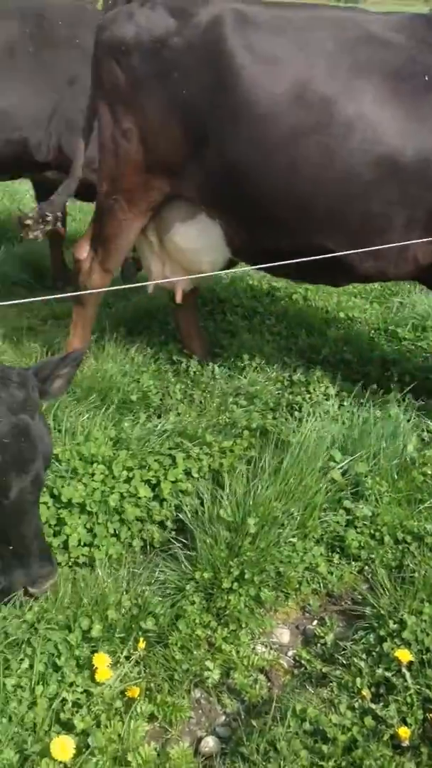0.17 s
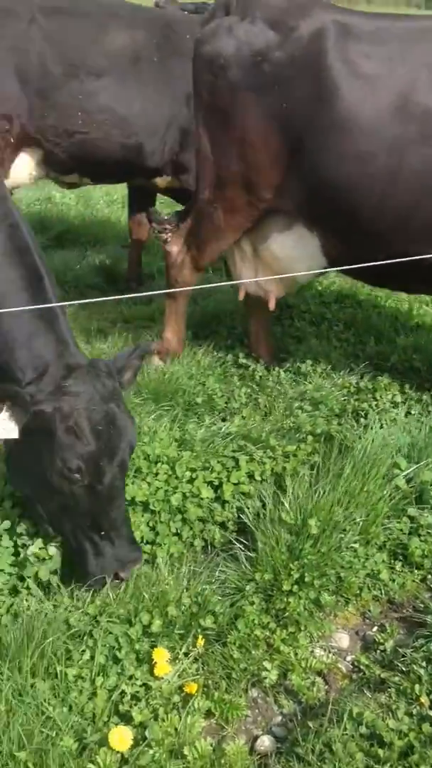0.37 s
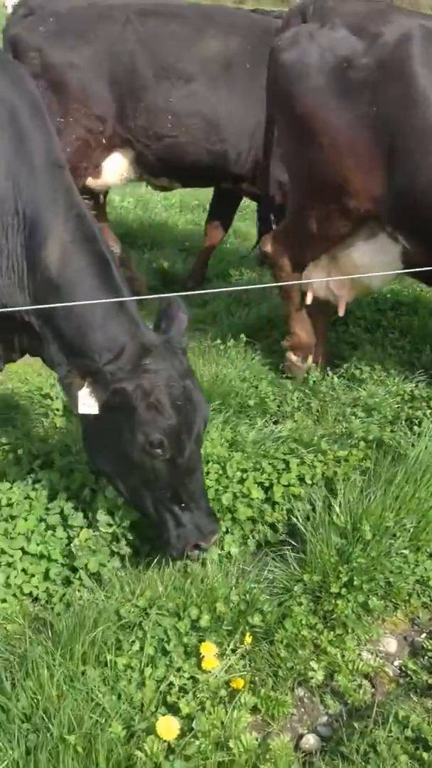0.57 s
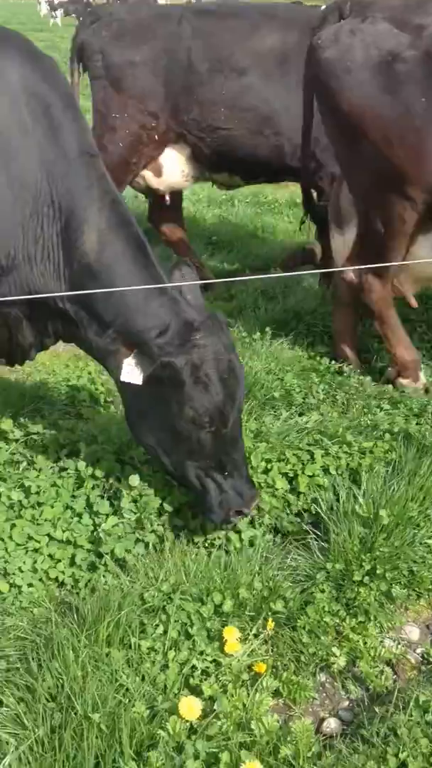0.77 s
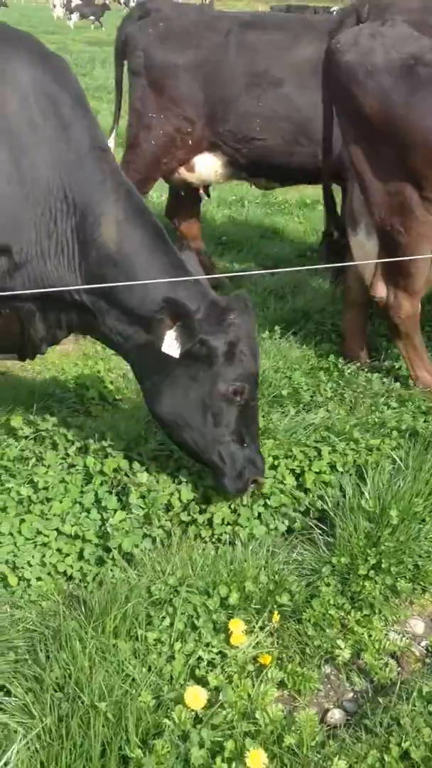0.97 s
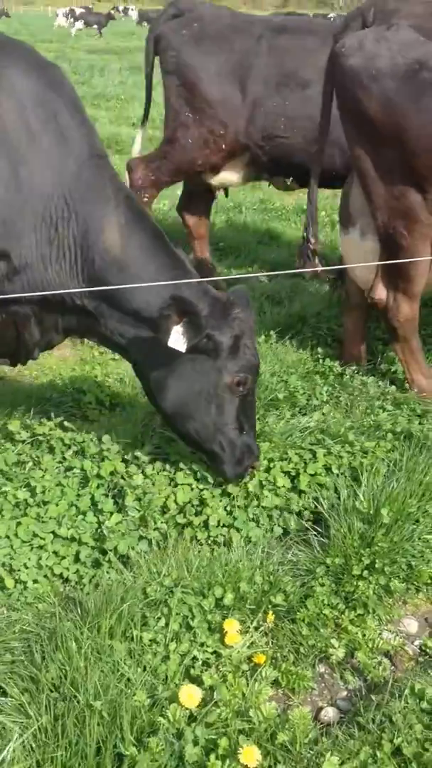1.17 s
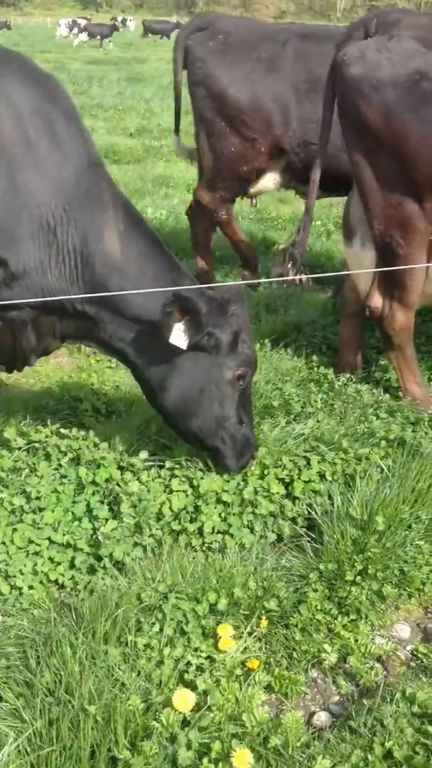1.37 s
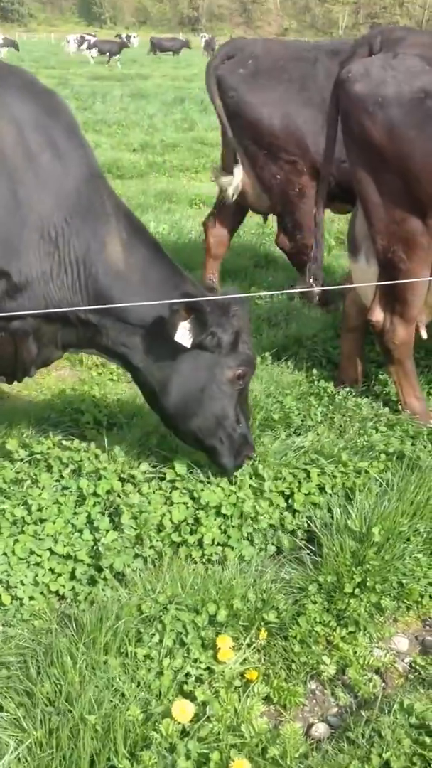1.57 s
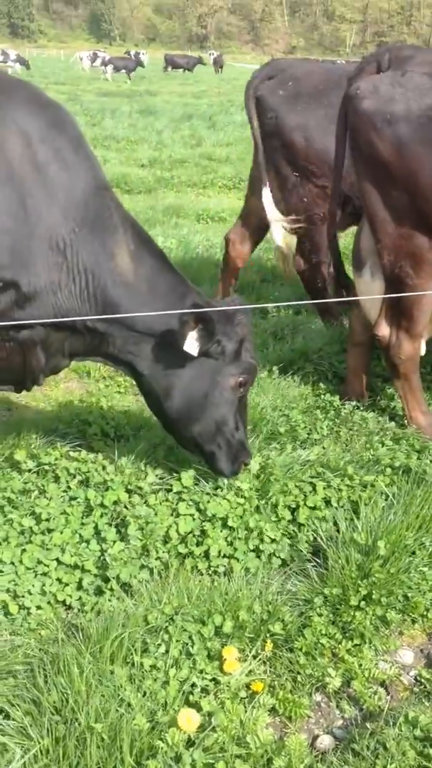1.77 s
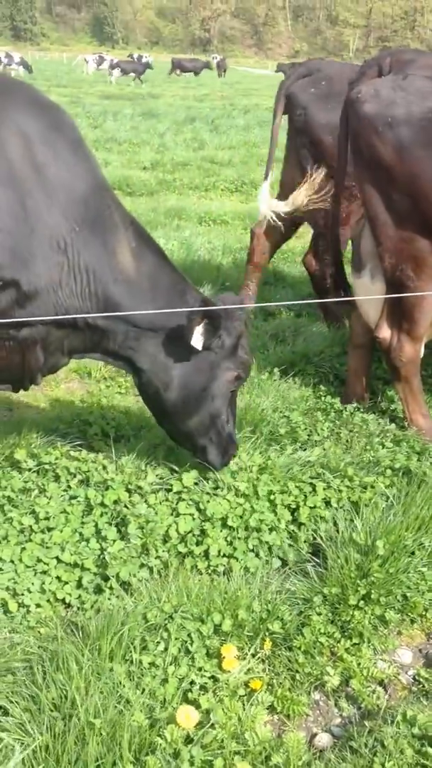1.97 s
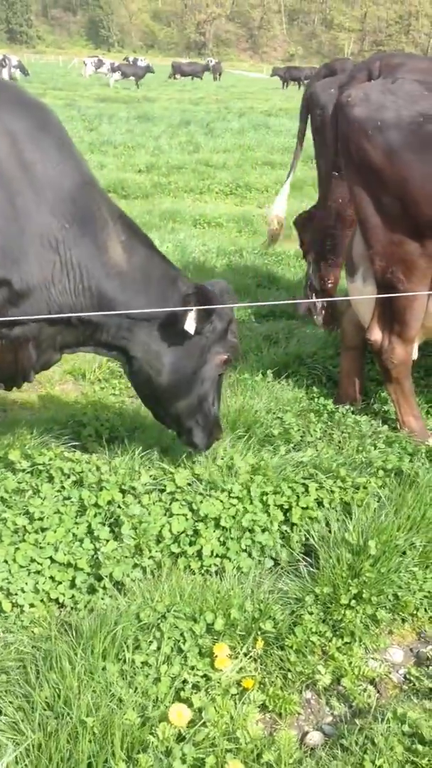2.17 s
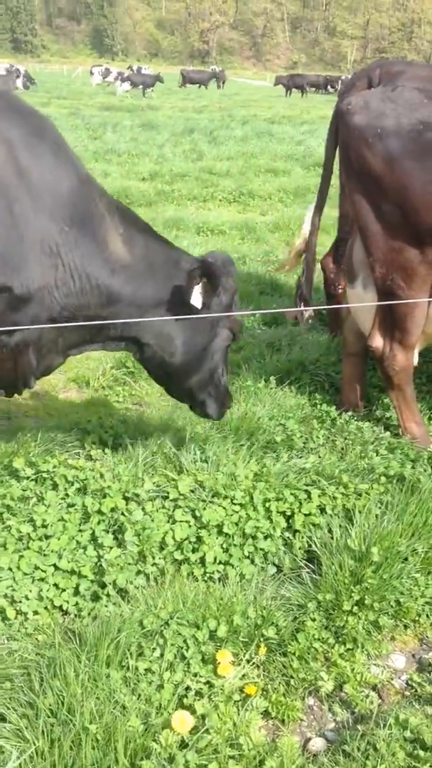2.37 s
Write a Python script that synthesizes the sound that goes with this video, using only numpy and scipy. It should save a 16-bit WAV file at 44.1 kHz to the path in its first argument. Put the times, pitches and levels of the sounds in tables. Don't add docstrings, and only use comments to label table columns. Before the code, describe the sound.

Uneven low wind bumps on a phone microphone outdoors, with an early crisp grass rip and stem pop, faint rustling, a later softer tear, a tiny far bird chirp, and finally a strong flapping gust.

```python
import sys
import numpy as np
from scipy import signal
from scipy.fft import rfft, irfft
from scipy.io import wavfile

SR = 44100
rng = np.random.default_rng(int(sys.argv[2]) if len(sys.argv) > 2 else 0)


def natural_amplitude(level_db):
    exponent = np.asarray(level_db, float) / 20
    return 10 ** exponent


def output_pcm(signal):
    pcm = np.clip(np.atleast_2d(signal).T, -1, 1) * 32767
    wavfile.write(sys.argv[1], SR, np.round(pcm).astype(np.int16))


N = 106148


def rms_one(x):
    return x / np.sqrt(np.mean(x ** 2) + 1e-20)


def in_time(rows):
    s, *columns = np.transpose(rows)
    return [np.interp(np.arange(N) / SR, s, c) for c in columns]


def drift(rate):
    r = np.exp(-2 * np.pi * rate / SR)
    wander = signal.lfilter([1], [1, -2 * r, r * r], rng.standard_normal(N + SR))
    return rms_one(wander[SR:])


def butter(x, order, hz, kind):
    return signal.sosfilt(signal.butter(order, hz, kind, fs=SR, output="sos"), x)


def colour(x, points, skirt_db=18):
    octave = np.log2(np.arange(N // 2 + 1) * SR / N + 1)
    hz, db = np.transpose(points)
    at = np.log2(hz)
    outside = np.maximum(at[0] - octave, 0) + np.maximum(octave - at[-1], 0)
    gain = natural_amplitude(np.interp(octave, at, db) - skirt_db * outside)
    return rms_one(irfft(rfft(x) * gain, N))


def ring(clicks, hz, t60):
    r, w = natural_amplitude(-60 / (t60 * SR)), 2 * np.pi * hz / SR
    return signal.lfilter([0, np.sin(w)], [1, -2 * r * np.cos(w), r * r], clicks + 1e-18)


def turbulence():
    # (frequency [Hz], level per Hz [dB])
    low_colour = [(15, -74), (25, -58), (70, -52), (117, 0), (181, -0.5), (310, -11), (502, -31),
                  (900, -74), (1170, -80), (1980, -120)]
    # (frequency [Hz], level per Hz [dB])
    edge_colour = [(140, -34), (230, 0.5), (537, -10), (740, -24.5), (1030, -35), (2500, -53), (3250, -75),
                   (5500, -120)]
    low = colour(rng.standard_normal(N), low_colour)
    edge = colour(rng.standard_normal(N), edge_colour)
    return low, edge


def field_rumble():
    deep_hz, deep_db = 95, -45.5
    return natural_amplitude(deep_db) * rms_one(butter(rng.standard_normal(N), 2, deep_hz, "low"))


def steady_wind(low, edge):
    # (time [s], level [dB])
    wind_levels = [(0, -30.5), (.22, -39), (.29, -48.5), (.52, -41), (.63, -35), (.78, -36.5), (.85, -44.5),
                   (1.2, -49), (1.27, -36), (1.48, -39.5), (1.53, -49.5), (1.65, -31.5), (1.84, -36),
                   (1.91, -21.5), (1.96, -26.5), (2.1, -21), (2.37, -26.5), (2.41, -29)]
    rumble_grows, hiss_db, hiss_grows = 0.9, -20, 1.89
    level_db, = in_time(wind_levels)
    lumps_db = 2.0 * drift(54)
    rumble_db = rumble_grows * (level_db + 41.5) - 42 + lumps_db
    hiss_level_db = hiss_db + hiss_grows * (level_db + 27.0 + lumps_db) - 13
    return natural_amplitude(rumble_db) * low + natural_amplitude(hiss_level_db) * edge


def eddies(low, edge):
    # (time [s], peak level [dB], pitch [Hz], length [s])
    breeze_eddies = [(0.003, -16.5, 251, 0.016), (0.017, -18.5, 220, 0.0075), (0.041, -14.5, 177, 0.01),
                     (0.068, -25, 202.0, 0.0041), (0.081, -32, 211.0, 0.005), (0.097, -36, 215.0, 0.0043),
                     (0.124, -19.5, 171.0, 0.0092), (0.17, -21, 227, 0.0042), (0.188, -24, 215.0, 0.0073),
                     (0.202, -24, 190, 0.011), (0.237, -31, 163, 0.01), (0.261, -27, 166, 0.007),
                     (0.337, -35, 153, 0.011), (0.363, -34.5, 157, 0.021), (0.435, -34, 159, 0.012),
                     (0.462, -22.5, 215, 0.017), (0.522, -41, 166, 0.012), (0.551, -45, 187, 0.0065),
                     (0.577, -33, 211, 0.007), (0.608, -30, 180, 0.0029), (0.643, -37, 161, 0.011),
                     (0.706, -20, 231, 0.017), (0.728, -17.0, 190, 0.0078), (0.743, -27, 180, 0.007),
                     (0.762, -32, 187, 0.0053), (0.788, -37, 151.0, 0.0088), (0.819, -19.5, 177, 0.01),
                     (0.903, -25.0, 194.0, 0.009), (0.953, -21, 184.0, 0.0057), (0.988, -36.0, 172, 0.0061),
                     (1.04, -22, 185.0, 0.0045), (1.122, -30.5, 186, 0.0085), (1.186, -28.5, 250, 0.006),
                     (1.236, -24.5, 206, 0.014), (1.271, -29.0, 225, 0.0031), (1.301, -25.0, 200.0, 0.0059),
                     (1.332, -30, 182.0, 0.015), (1.35, -30, 220, 0.028), (1.365, -21.5, 205, 0.0067),
                     (1.39, -16.5, 234, 0.0039), (1.405, -22, 240, 0.0083), (1.419, -32.0, 170, 0.016),
                     (1.465, -20, 192.0, 0.0094), (1.484, -29.5, 165, 0.015), (1.5, -31, 189.0, 0.0073),
                     (1.571, -23.5, 202, 0.0051), (1.586, -35, 240, 0.01), (1.619, -30, 187.0, 0.0078)]
    # (time [s], peak level [dB], pitch [Hz], length [s])
    gust_eddies = [(1.657, -16.0, 171, 0.0096), (1.673, -16.5, 178, 0.0063), (1.683, -21.5, 220.0, 0.004),
                   (1.702, -20, 234, 0.013), (1.73, -19, 178, 0.011), (1.748, -16.5, 175, 0.011),
                   (1.785, -17.5, 255.0, 0.0053), (1.816, -17.5, 225, 0.0085),
                   (1.854, -17.5, 216.0, 0.0065), (1.872, -18.5, 223, 0.015), (1.892, -10, 283, 0.0041),
                   (1.922, -8.5, 265, 0.004), (1.94, -18, 174, 0.0054), (1.973, -23.0, 300, 0.006),
                   (1.986, -5.5, 222, 0.0038), (1.994, -14.5, 191.0, 0.004), (2.008, -11.5, 340.0, 0.0026),
                   (2.026, -9, 187.0, 0.0038), (2.039, -9, 215, 0.011), (2.053, -11.5, 210.0, 0.0072),
                   (2.065, -7.5, 205, 0.015), (2.075, -10, 235, 0.0063), (2.093, -33, 248, 0.0054),
                   (2.106, -4, 350, 0.003), (2.124, -7.5, 251, 0.0042), (2.133, -9.5, 228.0, 0.0045),
                   (2.151, -23, 320, 0.012), (2.165, -19, 330, 0.0044), (2.182, -23, 278.0, 0.0098),
                   (2.205, -16, 276.0, 0.0031), (2.222, -11, 260, 0.0049), (2.241, -15, 282.0, 0.0025),
                   (2.253, -17, 328.0, 0.0031), (2.274, -27, 182.0, 0.0032), (2.287, -15.0, 223.0, 0.0051),
                   (2.296, -14.5, 242, 0.0062), (2.307, -20.5, 200.0, 0.011), (2.331, -16.5, 276, 0.0059),
                   (2.352, -13.0, 297, 0.0057), (2.365, -14, 326, 0.004), (2.38, -21, 227.0, 0.012),
                   (2.405, -27.5, 240, 0.006)]
    # (time [s], peak level [dB], pitch [Hz], length [s])
    more_eddies = [
        (0.811, -23, 290, 0.0074),
        (1.883, -18, 200, 0.0093),
        (1.908, -17, 210, 0.0045),
        (1.927, -15, 208, 0.0046),
    ]
    rough, width = 0.18, 0.95
    tail, sag = 1.25, 0.16
    edge_db, edge_grows, edge_width = -16, 1.97, 0.82
    t, out = np.arange(N) / SR, np.zeros(N)
    gusts = [*breeze_eddies, *gust_eddies, *more_eddies]
    for (s, db, hz, length), turn in zip(gusts, rng.random(len(gusts))):
        near = slice(max(int((s - .05) * SR), 0), int((s + .05) * SR))
        since = t[near] - s
        age = since / (length * width / 2)
        age = np.where(age > 0, age / tail, age)
        bend = 1 - sag * np.clip(age, -2, 2) / 2
        cycles = np.cos(2 * np.pi * (hz * bend * since + turn))
        thump = (1 - rough) * cycles + rough * low[near]
        out[near] += natural_amplitude(db - 7.5 * age ** 2) * thump
        sharp_db = edge_db + edge_grows * (db + 5) - 6.8 * (age / edge_width) ** 2
        out[near] += natural_amplitude(sharp_db) * edge[near]
    return out


def grass():
    # (time [s], level [dB])
    rustle_levels = [(0, -59), (.1, -54), (.2, -55), (.46, -55.5), (.52, -51), (.62, -48.5), (.73, -48.5),
                     (.79, -50.5), (.86, -53.5), (.91, -57), (1.03, -55.5), (1.07, -59), (1.36, -59),
                     (1.5, -61.5), (1.66, -56), (1.95, -59.5), (2.15, -55.5), (2.41, -62)]
    # (frequency [Hz], level per Hz [dB])
    grass_colour = [(240, -28), (400, -5.5), (473, -14), (642, -8.5), (1560, -14), (2830, -17),
                    (9300, -20.5), (14300, -22.5), (15400, -23.5)]
    # (time [s], peak level [dB], T60 [s])
    torn_tufts = [
        (0.1496, -25, 0.084),
        (0.2603, -48, 0.054),
        (0.32, -26.5, 0.037),
        (0.9602, -52, 0.088),
        (1.559, -33.5, 0.23),
        (1.6714, -35, 0.2),
    ]
    rustle_lift_db = 3.5
    snaps_per_s, snap_spread_db, snap_share = 1500, -1.5, 0.39
    warm_hz, warm_db, warm_grows = 580, -48, 2.9
    t = np.arange(N) / SR
    level_db, = in_time(rustle_levels)
    sizes = natural_amplitude(snap_spread_db * np.minimum(rng.exponential(1, N), 5)) * rng.choice([-1, 1], N)
    snaps = rms_one(sizes * (rng.random(N) < snaps_per_s * natural_amplitude(4.0 * drift(30)) / SR))
    brushing = snap_share * snaps + (1 - snap_share) * rng.standard_normal(N)
    body = colour(brushing, grass_colour, skirt_db=37.0)
    tear_power = np.zeros(N)
    for s, db, t60 in torn_tufts:
        fall_db = 60 * np.maximum(t - s, 0) / max(t60, .01)
        tear_power += natural_amplitude(db - 16.5 - fall_db) ** 2 * (t >= s)
    pull = rms_one(butter(rng.standard_normal(N), 2, [warm_hz / 2, warm_hz * 1.58], "band"))
    warm = natural_amplitude(warm_db + warm_grows * (level_db + 49.0)) * pull
    rustle = natural_amplitude(level_db + rustle_lift_db + 1.0 * drift(12.3))
    return np.sqrt(rustle ** 2 + tear_power) * body + warm


def collar():
    # (time [s], length [s], low links level [dB], high links level [dB])
    jingles = [(0.126, .012, -51, -54), (0.148, 0.025, -32, -32.5), (0.421, 0.013, -40, -44),
               (0.57, .012, -50, -48), (0.834, .012, -43, -46), (0.857, .03, -41, -47),
               (0.907, .008, -53, -51), (1.602, .01, -60, -57), (2.01, .015, -57, -65),
               (2.022, .045, -39, -45), (2.082, .04, -56, -46), (2.137, 0.033, -41, -40),
               (2.182, 0.02, -43, -41), (2.258, .06, -60, -65), (2.344, 0.0091, -57, -60),
               (2.392, 0.013, -62, -51)]
    # (frequency [Hz], level [dB])
    link_modes = [(12350, -18), (12520, -2), (12720, 0), (12860, -11.5), (13100, -8), (13480, -26),
                  (14118, -1), (14344, -7), (14452, -3), (14694, -6), (14850, -6), (15050, -9), (15230, -3)]
    high_links_hz, link_t60_s = 13800, 0.035
    touches_per_s, touch_spread_db = 310, 5.5
    shake_fade_s, shake_sag_db, link_wander_db = 0.0092, 2.5, 3.5
    t, low, high = np.arange(N) / SR, np.zeros(N), np.zeros(N)
    for s, length, low_db, high_db in jingles:
        fade = np.exp(-np.maximum(t - s - length, 0) / shake_fade_s)
        sag = natural_amplitude(shake_sag_db * (.5 - np.clip((t - s) / length, 0, 1)))
        shake = (t >= s) * fade * sag
        low += natural_amplitude(low_db) * shake
        high += natural_amplitude(high_db) * shake
    rate = touches_per_s * natural_amplitude(3.0 * drift(65)) / SR
    out = np.zeros(N)
    for hz, db in link_modes:
        shaking = high if hz > high_links_hz else low
        touches = (rng.random(N) < rate) * rng.choice([-1, 1], N)
        spread_db = touch_spread_db * rng.standard_normal(N).clip(-2, 1.5)
        force = natural_amplitude(db - 10 + link_wander_db * drift(11) + spread_db)
        out += ring(touches * shaking * force, hz, link_t60_s)
    return butter(out, 4, 11500, "high")


def stem_pop():
    # (time [s], peak level [dB], pitch [Hz], length [s])
    pops = [
        (0.149, -29.5, 1080, 0.0019),
    ]
    t, out = np.arange(N) / SR, np.zeros(N)
    for s, db, hz, length in pops:
        out += natural_amplitude(db - 6.9 * (2 * (t - s) / length) ** 2) * np.sin(2 * np.pi * hz * (t - s))
    return out


def bird():
    # (time [s], pitch [Hz], level [dB])
    chirp_path = [
        (1.761, 2990, -58),
        (1.782, 3230, -59),
        (1.802, 3320, -60),
    ]
    partner_ratio, partner_db = 1.5, -6
    t = np.arange(N) / SR
    hz, db = in_time(chirp_path)
    turn = 2 * np.pi * np.cumsum(hz) / SR
    start, end = chirp_path[0][0], chirp_path[-1][0]
    place = np.clip((t - start) / (end - start), 0, 1)
    swell = np.sqrt(np.sin(np.pi * place).clip(0))
    return natural_amplitude(db) * swell * (np.sin(turn) + natural_amplitude(partner_db) * np.sin(partner_ratio * turn))


def slaps():
    # (time [s], peak level [dB], pitch [Hz])
    air_slaps = [(1.894, -42, 650), (1.907, -32, 800), (1.92, -35, 721), (1.938, -35, 758),
                 (1.956, -36, 850), (1.985, -30, 1000), (2.009, -23.5, 895), (2.017, -36, 724),
                 (2.03, -23, 1040), (2.043, -22.5, 890), (2.064, -25, 786), (2.076, -20.5, 910),
                 (2.107, -16, 850), (2.114, -23.5, 768), (2.121, -19, 960), (2.128, -23.5, 800),
                 (2.137, -33, 865), (2.15, -36, 712), (2.164, -40, 787), (2.215, -28, 690),
                 (2.221, -28, 783), (2.23, -28, 766), (2.237, -30, 830), (2.248, -37, 717),
                 (2.291, -32, 794), (2.334, -34, 760), (2.352, -39, 740), (2.369, -36.5, 734)]
    lift_db, length_s, pitch, bite_db = 2.5, 0.0013, 0.9, -20.5
    t, out = np.arange(N) / SR, np.zeros(N)
    for (s, db, hz), turn in zip(air_slaps, rng.random(len(air_slaps))):
        near = slice(int((s - .02) * SR), int((s + .02) * SR))
        since = t[near] - s
        pulse = natural_amplitude(db + lift_db - 5.1 * (2 * since / length_s) ** 2)
        for k in (1, 2):
            tone = np.cos(2 * np.pi * (k * pitch * hz * since + turn))
            out[near] += pulse * natural_amplitude(bite_db * (k - 1)) * tone
    return out


def scene():
    low, edge = turbulence()
    wind = field_rumble() + steady_wind(low, edge) + eddies(low, edge) + slaps()
    return (wind + grass() + collar() + stem_pop() + bird())[None]


def roll_off(x):
    return signal.sosfilt(signal.butter(12, 15550, fs=SR, output="sos"), x)


def record(dry):
    port_hz, limit, top_hz = 87, .8, 15300
    thin = butter(dry, 4, port_hz, "high")
    rounded = limit * np.tanh(thin / limit)
    mix = signal.sosfilt(signal.ellip(10, .5, 60, top_hz, fs=SR, output="sos"), rounded)
    return roll_off(mix)


dry = scene()
out = record(dry)
output_pcm(out)
```